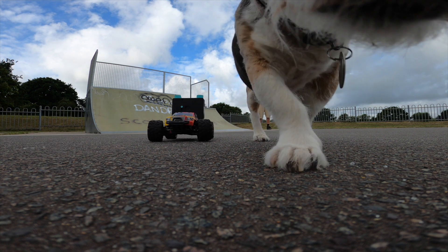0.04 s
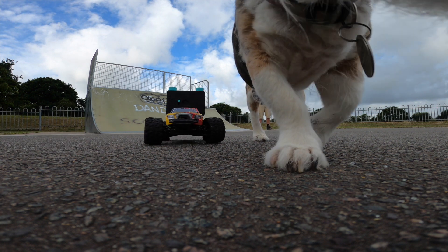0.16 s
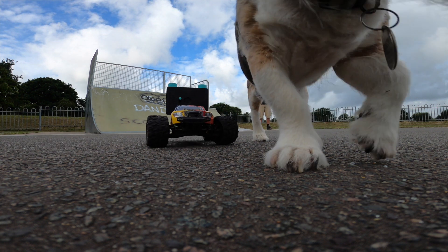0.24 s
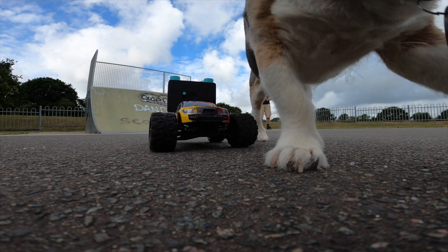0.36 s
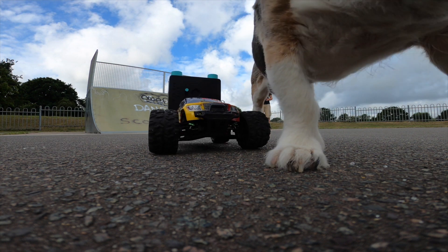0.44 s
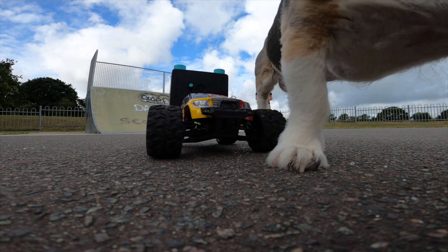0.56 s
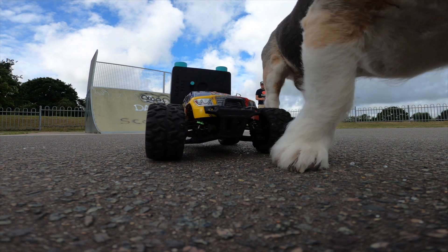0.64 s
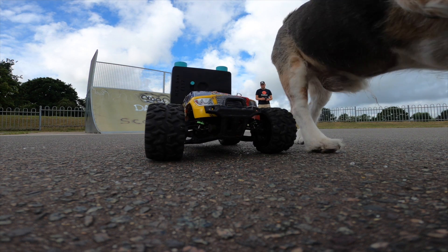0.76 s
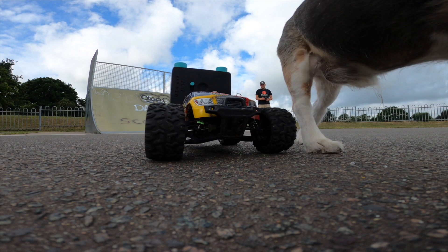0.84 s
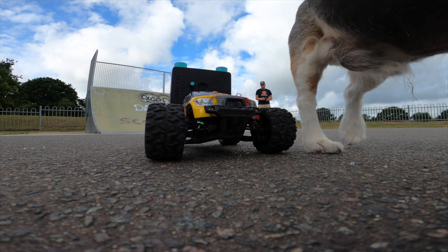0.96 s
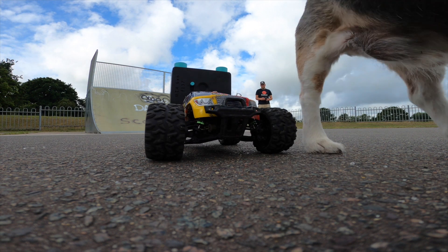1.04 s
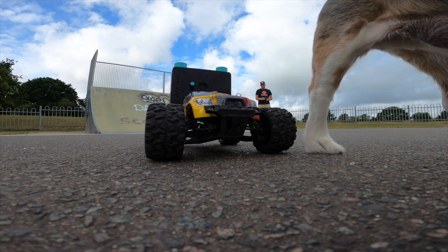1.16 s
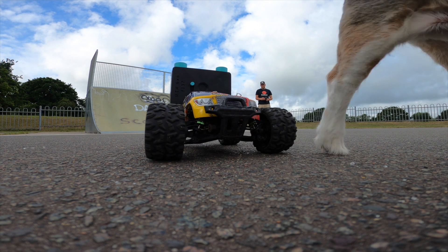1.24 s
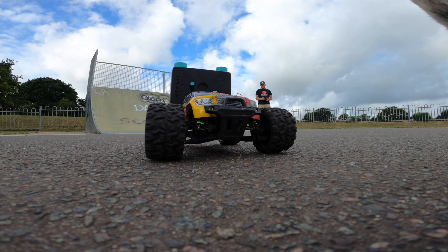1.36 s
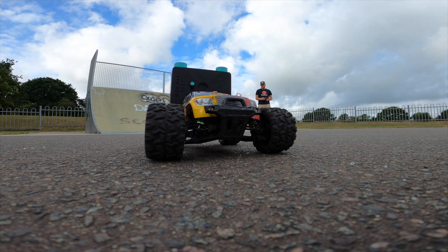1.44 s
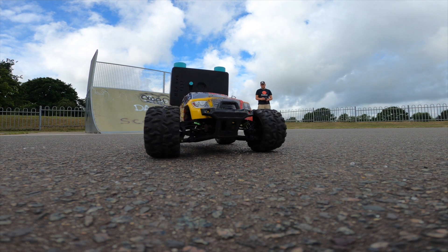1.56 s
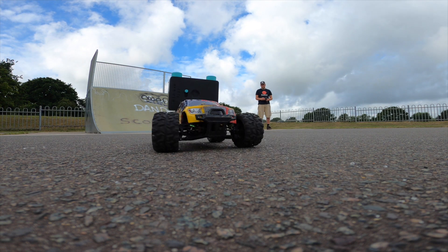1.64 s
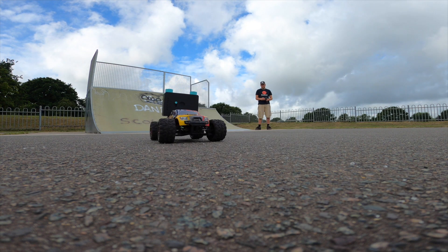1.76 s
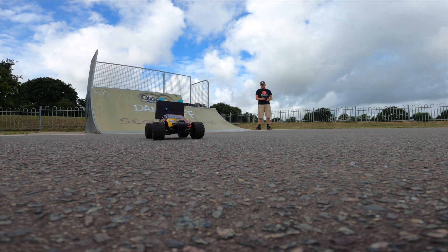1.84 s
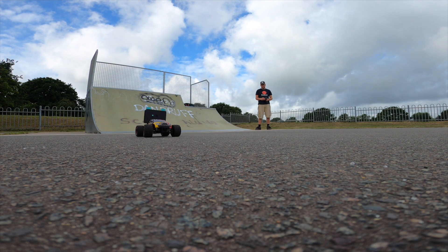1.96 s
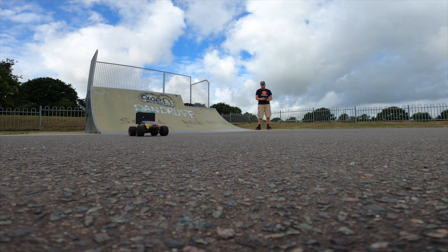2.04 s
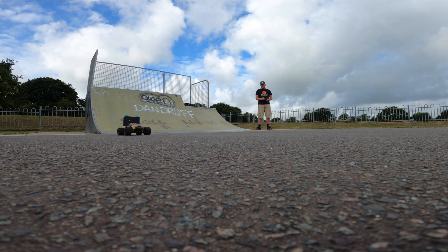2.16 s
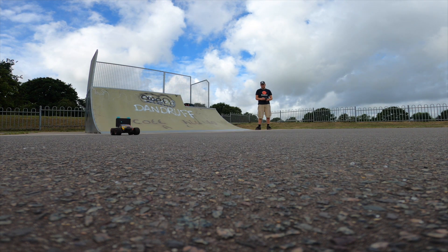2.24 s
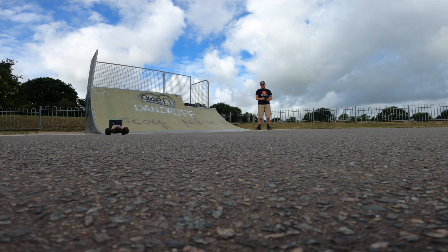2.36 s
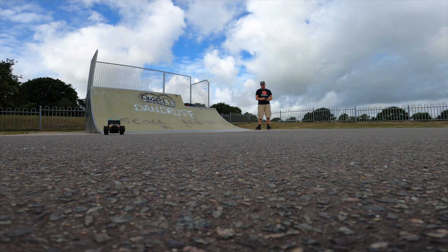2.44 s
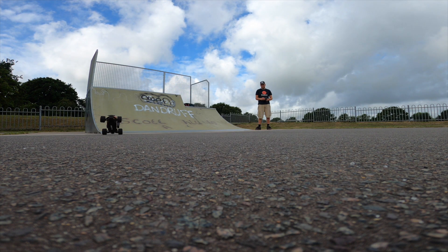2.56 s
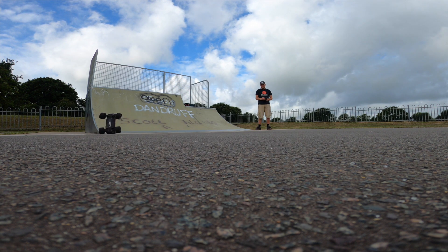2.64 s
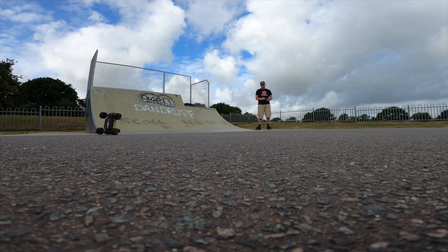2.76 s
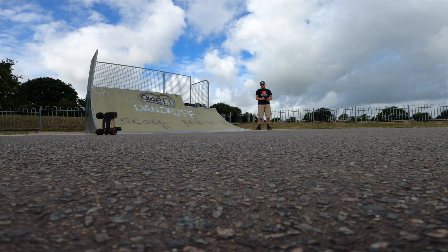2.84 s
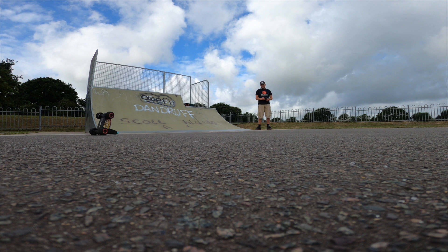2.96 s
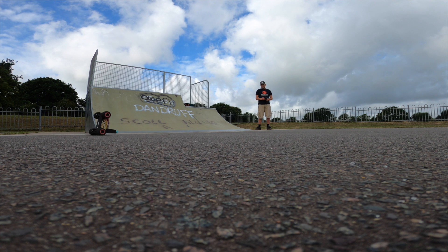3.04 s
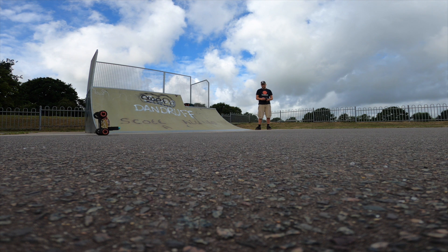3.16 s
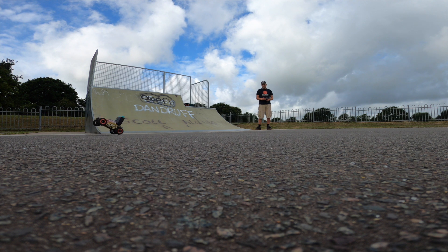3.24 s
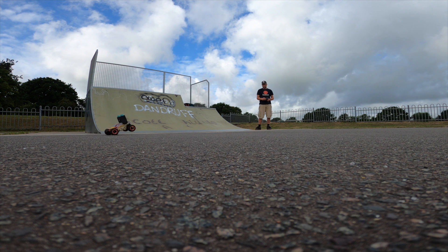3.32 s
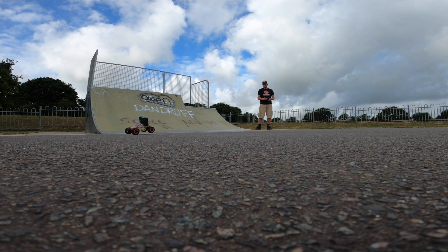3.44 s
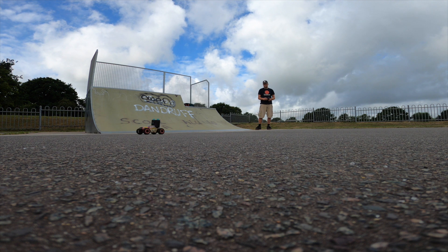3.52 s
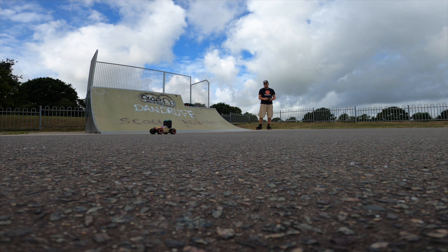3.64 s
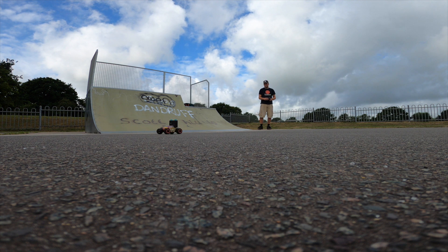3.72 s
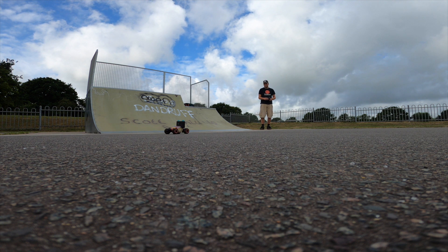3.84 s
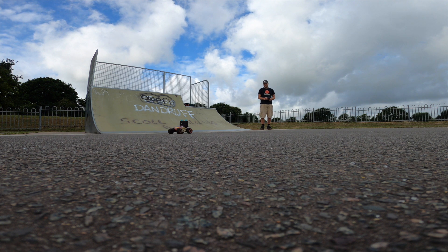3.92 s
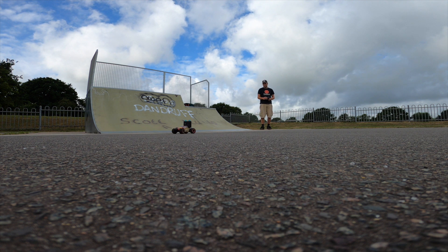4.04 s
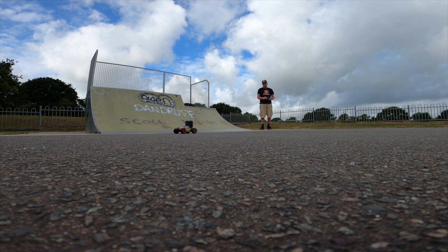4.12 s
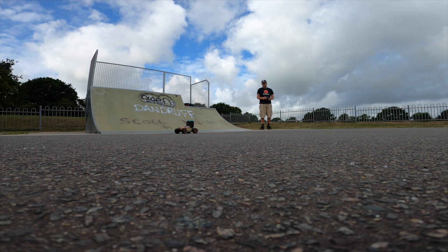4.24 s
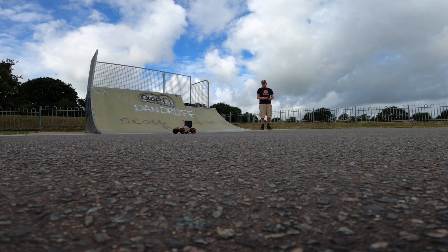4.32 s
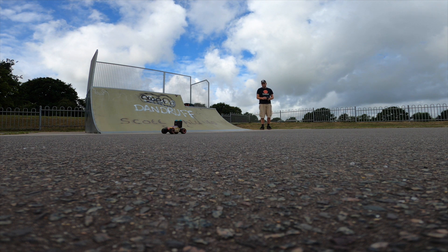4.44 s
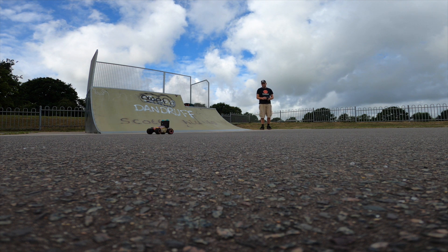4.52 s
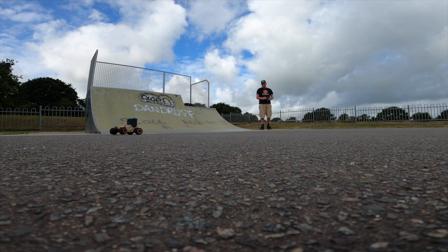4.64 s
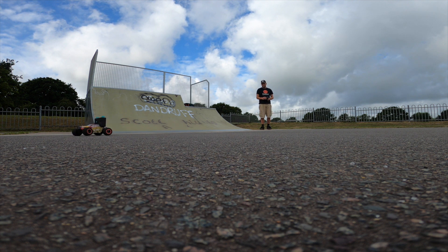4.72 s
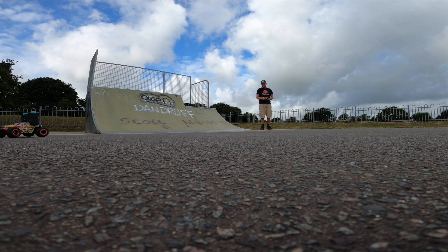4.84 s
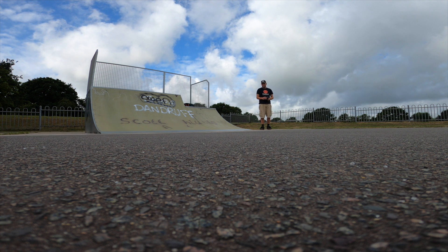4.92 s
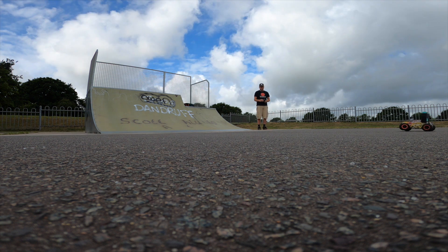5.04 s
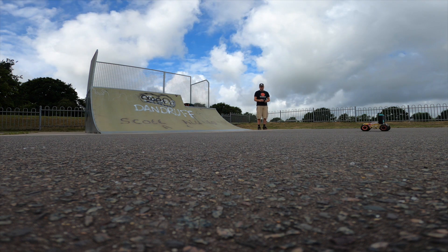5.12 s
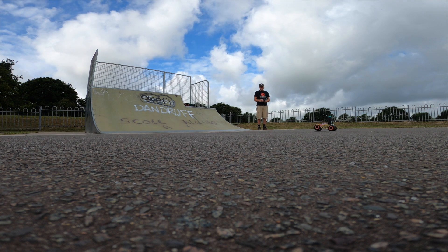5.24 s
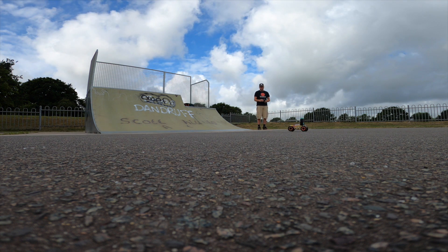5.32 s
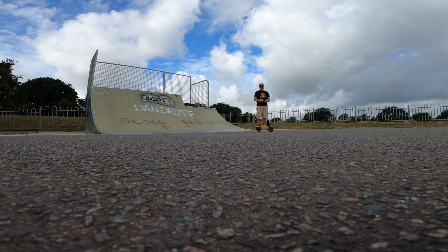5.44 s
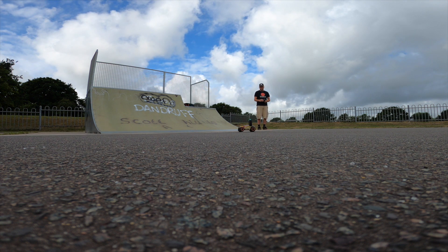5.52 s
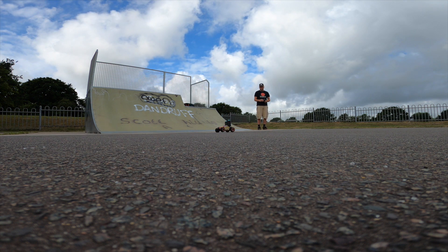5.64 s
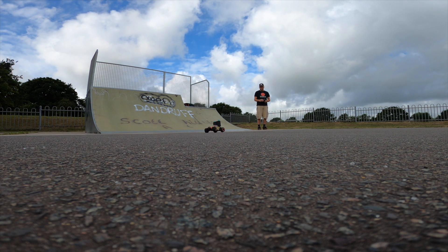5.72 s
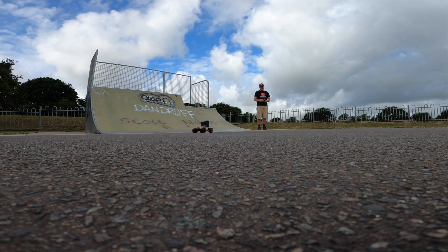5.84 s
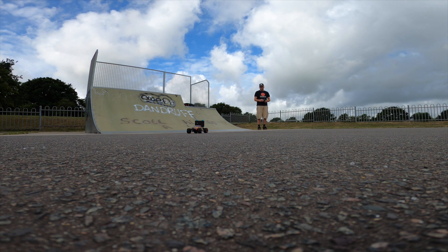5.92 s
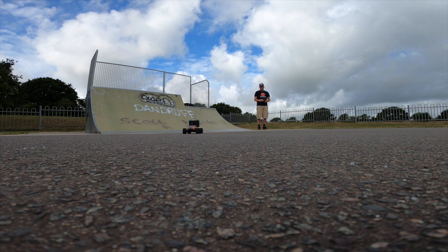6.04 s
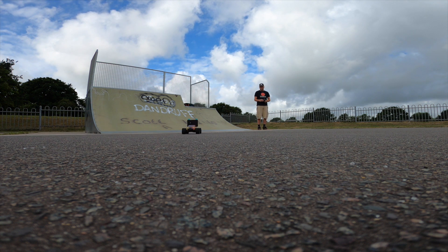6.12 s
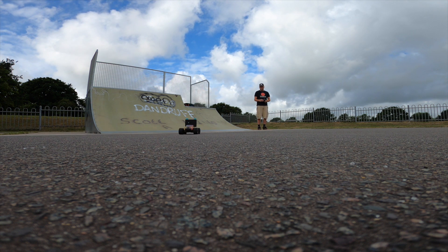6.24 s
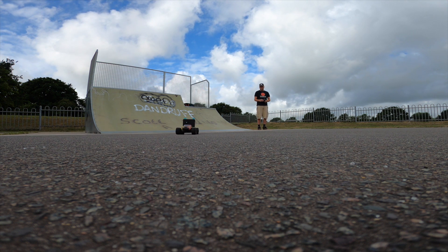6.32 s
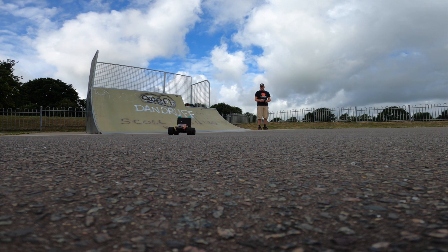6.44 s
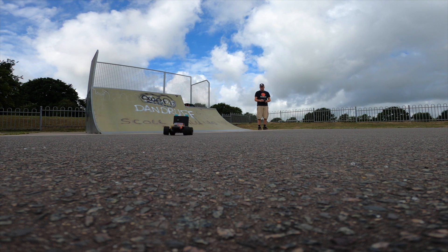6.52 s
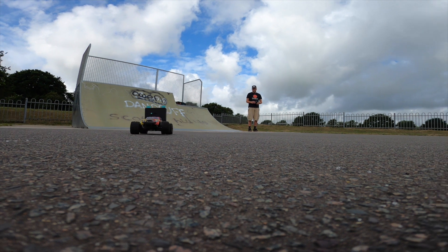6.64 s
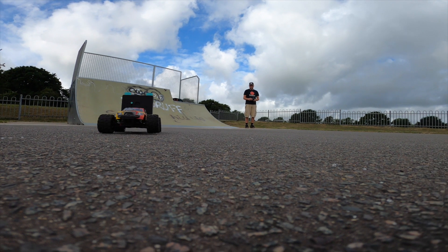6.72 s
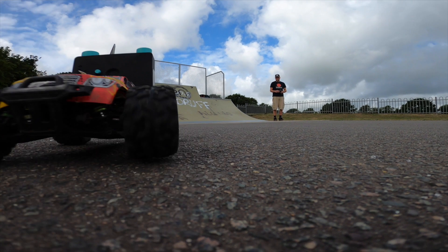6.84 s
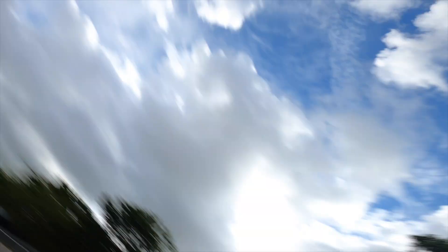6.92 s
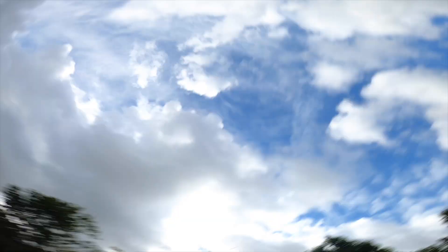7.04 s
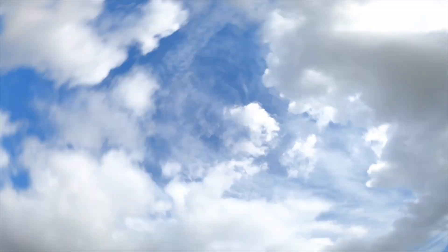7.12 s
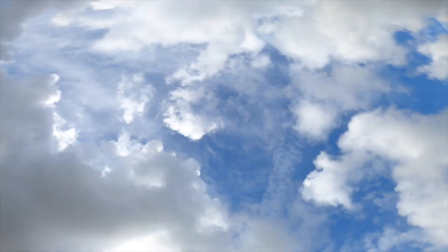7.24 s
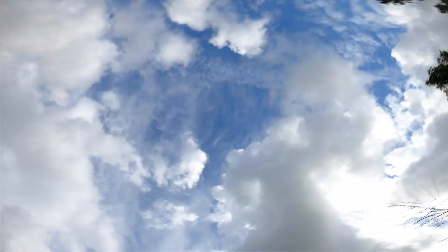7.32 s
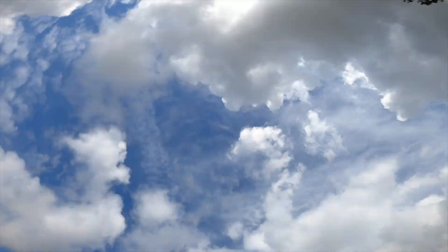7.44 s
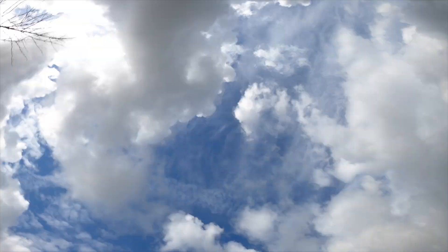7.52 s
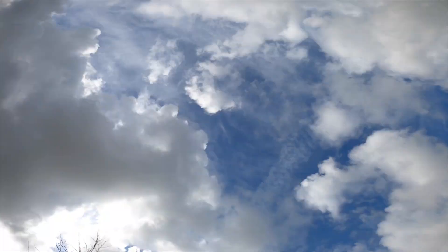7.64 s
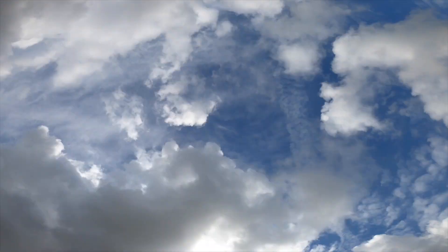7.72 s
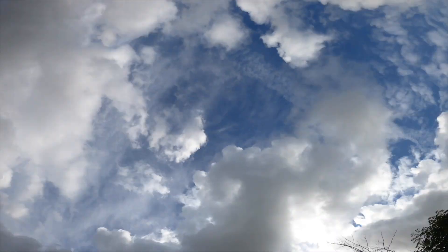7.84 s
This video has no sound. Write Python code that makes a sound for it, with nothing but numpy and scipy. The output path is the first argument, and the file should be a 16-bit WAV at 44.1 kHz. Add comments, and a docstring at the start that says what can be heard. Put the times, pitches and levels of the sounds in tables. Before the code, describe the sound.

Outdoor skate park, microphone low on asphalt, light wind and faint distant town murmur. From 0 to 0.6 s a small electric truck coasts close with gritty tyre noise; a dog's paw pads softly at 0.27, scuffs follow at 0.4 and 0.8, and single stones snap until 1.6. At 1.6 a tiny motor buzz, then bumps and a loud tyre surge with whining gears, fading as it reverses off. Around 2.65 another whirr, then hard plastic clatters from 2.8 to 3.15, more blows at 3.4 to 3.7. A quiet gap with grit ticks. At 4.5 gears whine again, highest from 5.06 to 5.4, with steady rolling until 5.7, then fading. At 6.45 it charges with rising whine and growing roar; at 6.97 it hits. The microphone knocks sharply until 7.55, then scrapes, rattles and catches on stones to 8 s, the town murmur muffled.

```python
"""A small electric model truck drives on asphalt round a camera that lies on the ground of a skate park.
Tyre noise surges as it coasts up, reverses, lands hard at a ramp, circles and charges the camera; gears whine
in harmonics at each burst of throttle. The struck camera knocks, rattles and skids as clicks, thuds and case modes.
A dog's paws pad and scuff past, grit snaps in short noise bursts; light wind and a distant town are shaped noise."""
import sys
import numpy as np
from scipy import signal
from scipy.fft import rfft, irfft
from scipy.io import wavfile
from scipy.ndimage import uniform_filter1d

SR = 44100
rng = np.random.default_rng(int(sys.argv[2]) if len(sys.argv) > 2 else 0)


def dump_mix(stems):
    """Bounce the given channels to the path in sys.argv[1] as a 16-bit WAV at rate SR."""
    frames = np.atleast_2d(stems).T  # one column per channel
    limited = np.clip(frames, -1, 1)  # hard clip at full scale
    pcm = np.round(limited * 32767).astype(np.int16)
    wavfile.write(sys.argv[1], SR, pcm)


N = 347508
TIME_S = np.arange(N) / SR

# Truck surges: at speed t/s, hold/s, body level/dB, rise/(dB/s), drift/(dB/s), fall/(dB/s),
# boom re body/dB, hiss re body/dB
SURGES = [(0.0, 0.53, -30, 100, -8.5, 44, -8.5, -7), (1.725, 0.67, -19, 160.5, -19.5, 85, -11, -6),
          (2.333, 0.22, -31.5, 200, -4.5, 28, -7, -5), (2.765, 0.14, -22.5, 90, -16, 53, -15, -6.5),
          (3.416, 0.018, -25.5, 63, -8, 93, -12.5, -10), (3.62, 0.049, -31.5, 65, -35, 36, -23, -6.5),
          (4.566, 1.1, -25, 150, 0, 22.5, -11, -6.5), (6.556, 0.4, -26.5, 60, 25, 897, -9.5, -3)]
# Tyre noise spectrum: f/Hz, level/dB
ROLL_SPECTRUM = [(70, -54), (92, -25.5), (472, -4), (850, 1), (1520, -4.5), (1900, -9.5), (2720, -7),
                 (4360, -12.5), (5460, -29.5), (10500, -35.5), (13400, -48), (15000, -79)]
# Tyre and plastic chassis resonances: f/Hz, width/Hz, level re the rest/dB
CHASSIS_MODES = [(754, 117, 1.5), (2050, 314, 7), (1090, 120, -19), (5110, 1100, 9.5)]
KICK_DB = -20  # a surge sets in abruptly this far under its full level
BODY_FLUTTER_DB, HISS_FLUTTER_DB = 1.9, 2.0

# Throttle bursts: t/s, length/s, first mesh rate f/Hz, last mesh rate f/Hz, level/dB, overtones/dB
THROTTLE = [(1.70, .16, 2000, 2160, -28, -1), (1.855, .19, 1740, 1760, -24.5, 1.5),
            (2.03, .215, 1730, 1950, -22, -1), (2.645, .082, 1250, 2580, -23.5, -1),
            (2.715, .07, 2150, 1750, -28, 3), (2.82, .025, 2050, 1800, -31, 4),
            (3.295, .095, 1400, 2480, -27.5, -3.5), (4.535, .09, 1400, 2480, -23.5, -5),
            (4.625, .055, 2550, 2270, -25, -3), (4.68, .09, 2300, 2750, -26, -3),
            (5.025, .035, 1840, 2100, -25, -9), (5.06, .36, 3380, 3220, -25.5, 1.5),
            (6.44, .07, 1950, 2400, -34, 3), (6.515, .17, 1850, 2580, -21.5, 2.5),
            (6.675, .145, 3150, 3450, -26.5, 10), (6.82, .135, 3480, 3120, -22, 7)]
# Gearbox radiation: f/Hz, gain/dB
GEARBOX_SPECTRUM = [(700, -6), (1500, 0), (1950, 1), (3600, -1), (5050, 2), (5500, -4), (6100, -20),
                    (7800, -30), (9200, -19), (14000, -46)]
# Tooth rasp spectrum: f/Hz, level/dB
RASP_SPECTRUM = [(1200, -30), (2050, -2), (2750, -10), (3400, 2), (4600, 1), (5100, 8), (5650, -9),
                 (7600, -30), (9200, -20), (14000, -55)]
GEAR_RASP_DB = -10.5  # re the overtones
SPIN_UP_S, WHINE_ATTACK_S, WHINE_RELEASE_S = .28, .022, .02
# Buzz of the stalled motor: t/s, length/s, f/Hz, level/dB
MOTOR_START = (1.602, .04, 985, -29.5)

# Truck bumps and landings: t/s, peak level/dB, ring t60/s, upper band edge f/Hz
BUMPS = [(1.706, -15, .05, 6000), (1.730, -10, .14, 5000), (1.820, -10, .07, 3000), (2.787, -2, .05, 5500),
         (2.808, -5, .03, 2000), (2.845, -5, .008, 1800), (2.866, -13, .09, 5000), (2.942, -13, .07, 7000),
         (2.977, -13, .04, 5000), (3.046, -10, .12, 4000), (3.053, -4, .14, 4000), (3.068, -6, .05, 3000),
         (3.121, -12, .1, 4000), (3.148, -15, .015, 2000), (3.423, -6, .1, 6000), (3.441, -2, .025, 6500),
         (3.602, -19, .025, 5000), (3.620, -12, .13, 8000), (3.697, -16, .07, 4000), (6.968, -1, .04, 5000)]
# Bump spectrum: f/Hz, level/dB
BUMP_SPECTRUM = [(70, -49), (160, -3), (420, -3), (1000, 3), (1950, -12.5), (2380, -5), (2970, -12),
                 (4520, -12.5), (10300, -29), (14000, -83)]

# Tyres sliding in turns: full t/s, hold/s, level/dB, fall/(dB/s)
SCRUBS = [(2.892, 0.04, -41, 112), (4, 0.029, -50, 144), (4.79, 0.025, -39, 69), (5.105, 0.072, -34.5, 15)]
# Scrub spectrum: f/Hz, level/dB
SCRUB_SPECTRUM = [(4000, 4.5), (6500, 3.5), (10500, -2.5), (15000, -30)]
SCRUB_RISE_DB_S = 212

# Camera strikes the ground: t/s, click peak/dB, thud/dB re THUD_DB, thud f/Hz, clack/dB re CLACK_DB
KNOCKS = [(6.9676, -25, -17, 238, -7.5), (6.986, -6, -16, 436, -25), (7.0329, -5, -13.5, 417, -14),
          (7.0991, 2, -14.5, 188, -35), (7.1451, -5, -8.5, 460, -9), (7.1724, -7.5, -20, 179, -10),
          (7.2094, -32, -23, 200, -39), (7.2546, -18, -15, 383, -17), (7.2915, -16.5, -20, 470, -31),
          (7.318, -7.5, -17, 413, -24), (7.351, -21, -23, 495, -18.5), (7.378, -17.5, -27, 498, -21.5),
          (7.4002, -9.5, -13.5, 390, -32), (7.413, -14, -21, 474, -15.5), (7.4888, -10, -15, 410, -18),
          (7.5506, -12, -27, 360, -16.5)]
# Sliding case catches on stones: t/s, click peak/dB, thud/dB re THUD_DB
CATCHES = [(7.4804, -14.5, -26), (7.5002, -20, -32), (7.5636, -18, -25), (7.5803, -24, -25),
           (7.5987, -19, -31), (7.6278, -9, -26), (7.640, -14.5, -25), (7.6676, -14, -32),
           (7.683, -13.5, -25), (7.7026, -21, -19), (7.735, -15, -14), (7.757, -8, -24),
           (7.787, -22, -18.5), (7.832, -15, -22), (7.84, -7, -20)]
THUD_DB, CLACK_DB = 9, 11
CATCH_HZ = 440  # centre of the random thud pitches
CATCH_CLACK_DB = -12.5  # re the click, before CLACK_DB is added
# Case modes: f/Hz, level/dB, t60/s of a free ring
CASE_MODES = [(460.5, -5.5, 0.062), (1170, -17.5, 0.054), (560, -27, 0.088)]
# Case click spectrum: f/Hz, level/dB
CASE_SPECTRUM = [(500, -12), (1200, 10.5), (2400, 12.5), (3400, 5), (7000, -2.5), (8200, -14.5),
                 (11000, -21), (15000, -46)]

# Camera slides: full t/s, hold/s, level/dB, rise/(dB/s), fall/(dB/s)
SLIDES = [(6.985, 0.034, -29, 898, 165), (7.65, .3, -24.5, 90, 100)]
# Skid spectrum: f/Hz, level/dB
SKID_SPECTRUM = [(60, -21), (264, 0), (380, 0), (470, 3.5), (560, 3.5), (680, -12), (1190, -8.5),
                 (1840, -32), (2300, -17), (5130, -34), (5880, -24), (6900, -28), (8100, -42), (14000, -64)]
RATTLE_PER_S, RATTLE_DB = 86, -10.5  # level re the slide
# Sharp stones scratch the case: t/s, spread/s, level/dB
SCRAPES = [(7.789, .002, -21), (7.868, 0.0028, -27)]
# Scratch spectrum: f/Hz, level/dB
SCRAPE_SPECTRUM = [(2000, -14), (5800, -2), (7100, 0), (8200, -18), (14000, -44)]

# Grit snaps under tyres and paws: t/s, peak level/dB
GRIT = [(0.639, -24), (0.7397, -33), (0.7816, -15.5), (1.271, -27), (1.5028, -24), (1.627, -18.5),
        (3.019, -21), (3.214, -31), (3.5366, -19.5), (3.7609, -24.5), (3.7847, -20), (4.1415, -31)]
# Grit spectrum: f/Hz, level/dB
GRIT_SPECTRUM = [(500, -44), (900, -13), (2300, -4), (3100, 0), (4600, -1), (6500, -12), (11000, -20),
                 (13500, -36), (16000, -62)]
# Fine grains tick: t/s, peak level/dB
TICKS = [(0.968, -35), (1.048, -39), (1.0879, -39), (3.687, -28), (4.224, -41)]
# Range of the stones' pitches: lowest f/Hz, highest f/Hz
PING_HZ = (2500, 5200)
# Tick band: low edge f/Hz, high edge f/Hz
TICK_BAND_HZ = (4100, 9300)
# Slow tyres close by crush coarse grit: t/s, length/s, rms level over that length/dB
CRUNCH = (0, 0.78, -41)

# A paw pads down beside the camera: t/s, spread/s, level/dB
PAW = (0.266, 0.01, -25)
# Paws drag over the asphalt: t/s, spread/s, level/dB
SCUFFS = [(0.392, 0.019, -31), (0.835, 0.014, -22.5)]

# Wind gusts: full t/s, hold/s, level/dB re WIND_DB
GUSTS = [(0.076, 0.59, -52), (4.55, 0.38, -41), (6.995, 0.071, -38)]
# Wind spectrum: f/Hz, level/dB
WIND_SPECTRUM = [(20, 3), (130, -6), (300, -11.5), (800, -57)]
WIND_DB, BREEZE_DB = 5.0, -63  # the steady breeze is re WIND_DB
GUST_RISE_DB_S, GUST_FALL_DB_S = 297, 73
# Town spectrum: f/Hz, level/dB
TOWN_SPECTRUM = [(50, -30), (227, -1), (900, -8), (1600, -10), (2500, -22.5), (5160, -33), (11400, -43.5),
                 (15000, -81)]
TOWN_DB = -46
HUSH_S, HUSH_DB = 6.2, -31  # from here the far town drops away and the fine crackle stops
TOP_HZ = 15800


def undb(db):
    """Decibels to gain."""
    return 10 ** (np.asarray(db) / 20)


def unit(x):
    """Scale to rms 1."""
    return x / np.sqrt(np.mean(x ** 2))


def peak(x, db):
    """Scale to a peak level."""
    return x * undb(db) / np.abs(x).max()


def noise(count=N):
    """White Gaussian noise."""
    return rng.standard_normal(count)


def gain_at(hz, points):
    """Gain of a (f/Hz, level/dB) spectrum, interpolated over log frequency."""
    f_hz, db = np.transpose(points)
    return undb(np.interp(np.log(hz + 1), np.log(f_hz), db))


def colour(x, points, order=4096):
    """Minimum-phase filter with the given spectrum, by folding the cepstrum."""
    cepstrum = irfft(np.log(gain_at(np.arange(order // 2 + 1) * SR / order, points)))
    cepstrum[1:order // 2] *= 2
    cepstrum[order // 2 + 1:] = 0
    return signal.fftconvolve(x, irfft(np.exp(rfft(cepstrum))))[:len(x)]


def band(x, lo_hz, hi_hz):
    """Gentle band-pass."""
    edges_hz = [lo_hz, min(hi_hz, SR / 2 - 1)]
    return signal.sosfilt(signal.butter(2, edges_hz, "band", fs=SR, output="sos"), x)


def split(x, order, hz, kind):
    """Zero-phase low- or high-pass."""
    return signal.sosfiltfilt(signal.butter(order, hz, kind, fs=SR, output="sos"), x)


def walk(rate_hz):
    """Random wander of rms 1, linear between knots at the given rate."""
    knots = noise(N // 20)
    return unit(np.interp(TIME_S * rate_hz, np.arange(len(knots)), knots))


def grains(per_s, spread_db):
    """Tiny contacts at random moments, of random sign and size, rms 1."""
    hits = rng.random(N) < per_s / SR
    signs = rng.choice([-1, 1], N)
    return unit(hits * signs * undb(spread_db * np.clip(noise(), -2, 2)))


def fade(t_s, t60_s):
    """Exponential decay by 60 dB in t60."""
    return np.exp(-np.log(1000) * t_s / t60_s)


def sine(hz, t_s):
    """Steady sine."""
    return np.sin(2 * np.pi * hz * t_s)


def during(start_s, end_s):
    """1 between two times, with short fades."""
    return uniform_filter1d(1. * ((TIME_S >= start_s) & (TIME_S <= end_s)), size=200)


def envelope_db(s, hold_s, rise_db_s, fall_db_s, drift_db_s=0):
    """Level that rises to 0 dB at time s, drifts during the hold, then falls."""
    t = TIME_S - s
    held = drift_db_s * np.clip(t, 0, hold_s)
    return rise_db_s * np.minimum(t, 0) + held - fall_db_s * np.maximum(t - hold_s, 0)


def swell(s, spread_s, db):
    """Brief bell-shaped rise and fall in gain."""
    return undb(db) * np.exp(-.5 * ((TIME_S - s) / spread_s) ** 2)


def add(out, s, x):
    """Mix a short sound in at time s."""
    i = max(int(s * SR), 0)
    out[i:i + len(x)] += x[:N - i]


def rolling():
    """Tread slaps the stones and shakes the chassis, loose grit hisses; the strongest surge leads each band."""
    body_db = boom_db = hiss_db = -np.inf
    for s, hold_s, db, rise, drift, fall, boom_re_db, hiss_re_db in SURGES:
        started = TIME_S > s + KICK_DB / rise
        level_db = np.where(started, db + envelope_db(s, hold_s, rise, fall, drift), -np.inf)
        body_db = np.maximum(body_db, level_db)
        boom_db = np.maximum(boom_db, level_db + boom_re_db)
        hiss_db = np.maximum(hiss_db, level_db + hiss_re_db)
    taps = grains(per_s=1300, spread_db=3.0) + 0.79 * noise()
    tread = colour(taps, ROLL_SPECTRUM)
    # each resonance is rattled harder or softer from moment to moment
    modes = sum(undb(db + 2 * walk(39)) * signal.lfilter(*signal.iirpeak(hz, hz / width_hz, fs=SR), tread)
                for hz, width_hz, db in CHASSIS_MODES)
    tyres = tread + modes
    low = split(tyres, 3, 520, "low")
    high = split(tyres, 3, 2900, "high")
    # uneven ground shakes the body and the grit hiss separately
    shake = undb(BODY_FLUTTER_DB * np.clip(walk(90), -2, 2))
    spray = undb(HISS_FLUTTER_DB * np.clip(walk(90), -2, 2))
    body = undb(body_db) * unit(shake * (tyres - low - high))
    boom = undb(boom_db) * unit(shake * low)
    hiss = undb(hiss_db) * unit(spray * high)
    return body + boom + hiss


def gears(harmonics=4):
    """Meshing teeth sing in harmonics; backlash and the bumpy ground shake their pitch and strength."""
    out = np.zeros(N)
    speed = 1 + .01 * walk(520) + .011 * walk(70)
    load = undb(2.2 * walk(65) - .5)  # bouncing wheels load and unload the teeth
    slip = .027 * walk(110)
    # rattling teeth scatter strength and phase, which frays each harmonic
    rattles = [.6 + .55 * (walk(280) + 1j * walk(280)) for _ in range(harmonics)]
    rasp = undb(GEAR_RASP_DB) * unit(colour(grains(per_s=4000, spread_db=-1.5), RASP_SPECTRUM))
    for s, length_s, first_hz, last_hz, db, overtones_db in THROTTLE:
        on = (TIME_S >= s) & (TIME_S <= s + length_s + WHINE_RELEASE_S)
        t = TIME_S[on] - s
        push = np.clip(np.minimum(t / WHINE_ATTACK_S, 1 - (t - length_s) / WHINE_RELEASE_S), 0, 1)
        progress = np.expm1(-t / SPIN_UP_S) / np.expm1(-length_s / SPIN_UP_S)
        hz = first_hz + (last_hz - first_hz) * progress
        # teeth chatter and wheels slip more while the motor revs up hard
        strain = np.clip(np.gradient(hz) * SR / 6000, 0, .8)
        hz = hz * (speed[on] + strain * slip[on])
        phase = 2 * np.pi * np.cumsum(hz) / SR
        whine = 0
        for k, rattle in enumerate(rattles, 1):
            strength = gain_at(k * hz, GEARBOX_SPECTRUM) * min(1, 2 / k) ** 2 * undb(overtones_db * (k > 1))
            whine = whine + strength * (rattle[on] * np.exp(1j * k * phase)).real
        # off-centre spur gear and pinion press harder once a turn: sidebands
        runout = 1 + .45 * np.sin(phase / 27) + strain * np.sin(phase / 8)
        teeth = load[on] * whine + undb(overtones_db) * rasp[on]
        loudness = undb(db) * hz / max(first_hz, last_hz)  # faster gears are louder
        out[on] += teeth * runout * push * loudness
    return out


def motor_start(second_db=-6, third_db=-17):
    """The speed controller's pulses make the windings buzz in three harmonics until the wheels turn."""
    s, length_s, hz, db = MOTOR_START
    buzz = sine(hz, TIME_S) + undb(second_db) * sine(2 * hz, TIME_S) + undb(third_db) * sine(3 * hz, TIME_S)
    return undb(db) * during(s, s + length_s) * buzz


def bumps():
    """Each blow sets the loose shell and suspension chattering: decaying noise of uneven strength."""
    out, t = np.zeros(N), TIME_S[:SR // 5]
    for s, db, t60_s, dull_hz in BUMPS:
        chatter = noise(len(t)) * np.exp(.45 * noise(len(t)))
        blow = colour(chatter * fade(t, t60_s), BUMP_SPECTRUM)
        add(out, s, peak(band(blow, 20, dull_hz), db))
    return out


def scrub():
    """Tyres sliding in the turns spray fine grit."""
    gain = sum(undb(db + envelope_db(s, hold_s, SCRUB_RISE_DB_S, fall)) for s, hold_s, db, fall in SCRUBS)
    return unit(colour(grains(per_s=5000, spread_db=10.0), SCRUB_SPECTRUM)) * gain


def knocks(click_t60_s=0.01, thud_t60_s=0.016, clack_t60_s=0.01, clack_hz=1000, lag_s=0.0011):
    """A corner clicks on stone, the housing clacks, its mass thuds a moment later and the case rings on."""
    out, t = np.zeros(N), TIME_S[:SR // 6]
    late = np.maximum(t - lag_s, 0)
    # every stone catches another part of the case, so the pitch differs
    catches = [(s, click_db, thud_db, CATCH_HZ * 2 ** rng.uniform(-0.58, 0.51), click_db + CATCH_CLACK_DB)
               for s, click_db, thud_db in CATCHES]
    for s, click_db, thud_db, thud_hz, clack_db in KNOCKS + catches:
        mass_db = thud_db + THUD_DB
        click = peak(colour(noise(len(t)) * fade(t, click_t60_s), CASE_SPECTRUM), click_db)
        housing_hz = clack_hz * (1 + 0.35 * rng.standard_normal())
        clack = peak(sine(housing_hz, t) * fade(t, clack_t60_s), clack_db + CLACK_DB)
        soft_onset = 1 - fade(late, 0.0067)
        thud = peak(sine(thud_hz, late) * fade(late, thud_t60_s) * soft_onset, mass_db)
        ring = sum(undb(mass_db + db) * sine(hz, t) * fade(t, t60_s) for hz, db, t60_s in CASE_MODES)
        add(out, s, click - clack + thud + ring)
    return out


def skid(rasp_db=-14, scrape_t60_s=0.011, tick_db=-5, tick_t60_s=0.015):
    """The case scrapes on stone after stone as it slides; bigger stones make it rattle."""
    gain = sum(undb(db + envelope_db(s, hold_s, rise, fall)) for s, hold_s, db, rise, fall in SLIDES)
    t = TIME_S[:SR // 20]
    scrapes = signal.fftconvolve(np.abs(grains(per_s=170, spread_db=4.5)), fade(t, scrape_t60_s))[:N]
    slide = colour((unit(scrapes) + undb(rasp_db)) * noise(), SKID_SPECTRUM)
    body = split(slide, 2, 1000, "low")
    flickering = (slide - body) * undb(2.0 + 1.1 * walk(310))
    stones = grains(per_s=RATTLE_PER_S, spread_db=1.5)
    # the modes die twice as fast here as in a free ring
    modes = sum(undb(db) * sine(hz, t) * fade(t, t60_s / 2) for hz, db, t60_s in CASE_MODES)
    ring = signal.fftconvolve(stones, modes)[:N]
    bursts = signal.fftconvolve(np.abs(stones), fade(t, tick_t60_s))[:N]
    ticks = colour(bursts * noise(), CASE_SPECTRUM)
    rattle = unit(ring) + undb(tick_db) * unit(ticks)
    return gain * (unit(body + flickering) + undb(RATTLE_DB) * rattle)


def scratches():
    """Sharp stones score the sliding case in short bright rasps."""
    return sum(swell(*scrape) for scrape in SCRAPES) * unit(colour(noise(), SCRAPE_SPECTRUM))


def snap(t60_s=0.014):
    """One stone cracks and pings at a pitch of its own; peak 1."""
    t = TIME_S[:SR // 20]
    crack = colour(noise(len(t)) * fade(t, t60_s), GRIT_SPECTRUM)
    ping = sine(rng.uniform(*PING_HZ), t) * fade(t, t60_s)
    return peak(peak(crack, 0) + .5 * ping, 0)


def grit(tick_t60_s=0.014, crackle_db=-65):
    """Single stones snap, coarse grit crunches under the slow tyres and fine grit ticks and crackles."""
    out, stones, t = np.zeros(N), np.zeros(N), TIME_S[:SR // 20]
    for s, db in GRIT:
        add(out, s, undb(db) * snap())
    for s, db in TICKS:
        add(out, s, peak(band(noise(len(t)) * fade(t, tick_t60_s), *TICK_BAND_HZ), db))
    start_s, length_s, db = CRUNCH
    for when, size in rng.random((60, 2)):
        add(stones, start_s + length_s * when, size ** 2 * (1 - .5 * when) * snap())
    crunch = undb(db) * np.sqrt(length_s * SR / N) * unit(band(stones, *PING_HZ))
    crackle = grains(per_s=120, spread_db=7) * undb(4 * walk(9)) * (TIME_S < HUSH_S)
    return out + crunch + undb(crackle_db) * unit(colour(crackle, GRIT_SPECTRUM))


def dog():
    """One paw pads down softly, others drag their claws over the asphalt."""
    pad = swell(*PAW) * unit(band(noise(), 107, 330))
    claws = unit(colour(grains(per_s=6900, spread_db=6.0), GRIT_SPECTRUM))
    return pad + sum(swell(*scuff) for scuff in SCUFFS) * claws


def outdoors():
    """Gusts buffet the microphone; the far town murmurs steadily, then drops away at 6.2 s."""
    gusts = sum(undb(db + envelope_db(s, hold_s, GUST_RISE_DB_S, GUST_FALL_DB_S)) for s, hold_s, db in GUSTS)
    buffeting = undb(4.2 * walk(11) + WIND_DB)
    wind = unit(colour(noise(), WIND_SPECTRUM)) * (undb(BREEZE_DB) + gusts) * buffeting
    murmur = unit(colour(noise(), TOWN_SPECTRUM)) * undb(.9 * walk(8))
    return wind + murmur * undb(TOWN_DB + HUSH_DB * (TIME_S > HUSH_S))


def scene():
    """All sources share one channel; only a faint high hiss, following its treble, differs left to right."""
    truck = rolling() + gears() + motor_start() + bumps() + scrub()
    camera = knocks() + skid() + scratches()
    mono = truck + camera + grit() + dog() + outdoors()
    treble = np.sqrt(np.abs(uniform_filter1d(band(mono, 10200, 10300) ** 2, size=500)))
    side = undb(-2.0) * treble * unit(band(noise(), 11600, 13800))
    return np.array([mono + side, mono - side])


def record(dry):
    """The microphone loses the deep bass, the hardest knocks overload it; the top is cut."""
    thin = signal.sosfilt(signal.butter(2, 64, "high", fs=SR, output="sos"), dry)
    overloaded = np.clip(thin, -.95, .95)
    return signal.sosfilt(signal.ellip(8, .2, 70, TOP_HZ, fs=SR, output="sos"), overloaded)


dry = scene()
out = record(dry)
dump_mix(out)
```